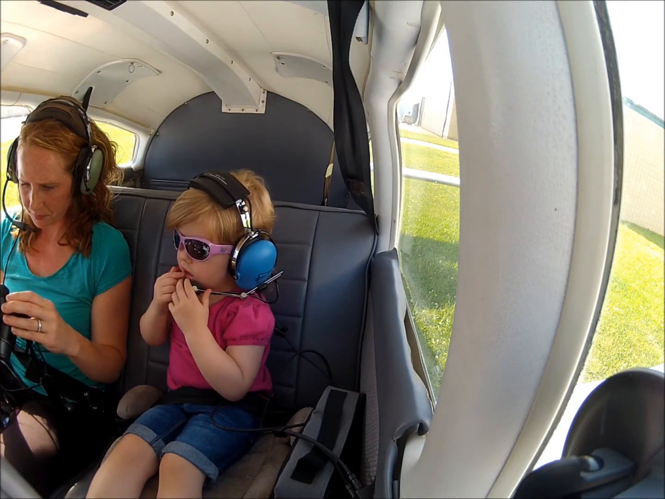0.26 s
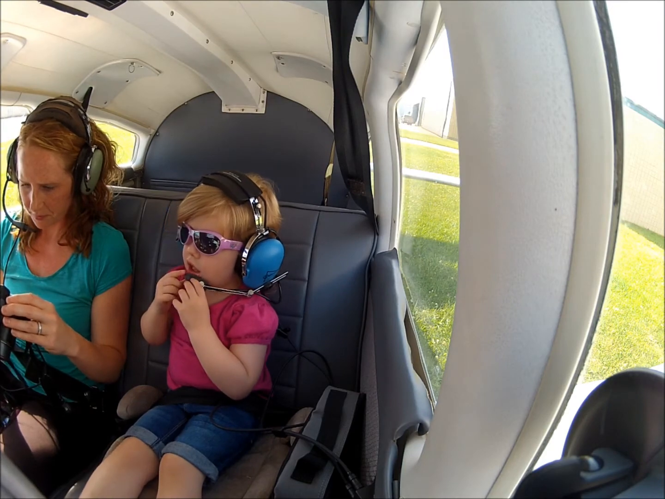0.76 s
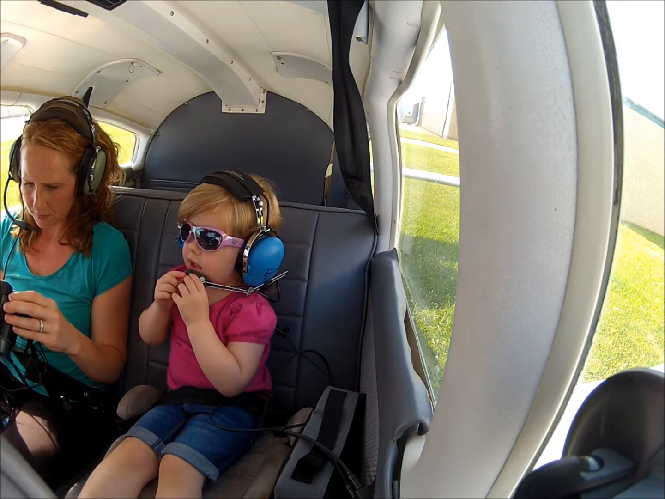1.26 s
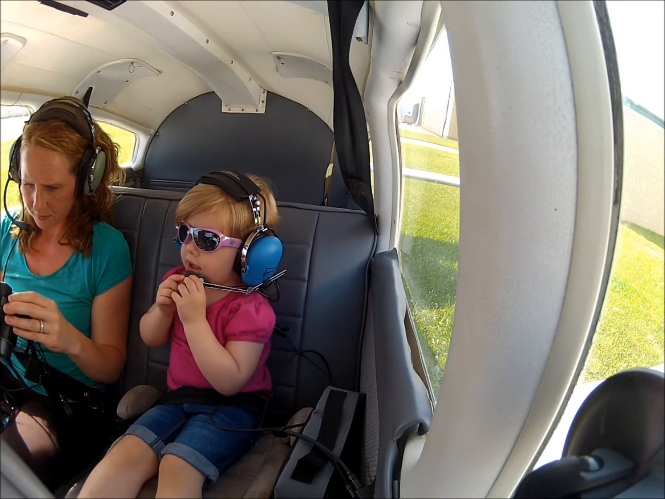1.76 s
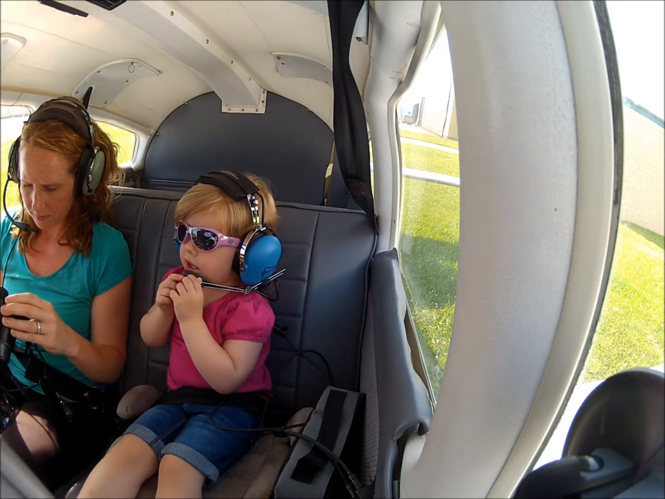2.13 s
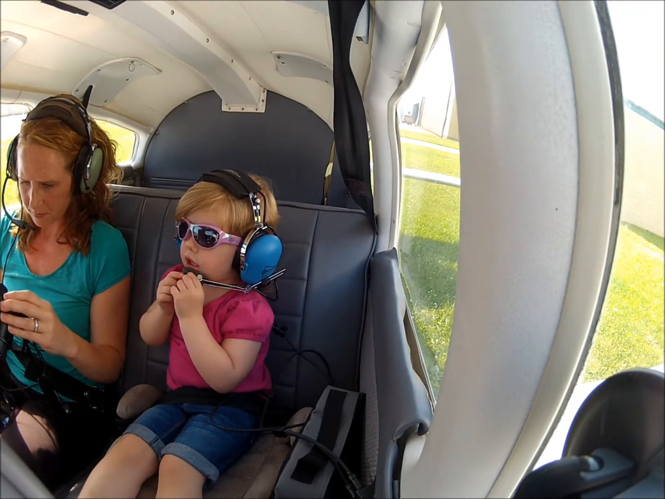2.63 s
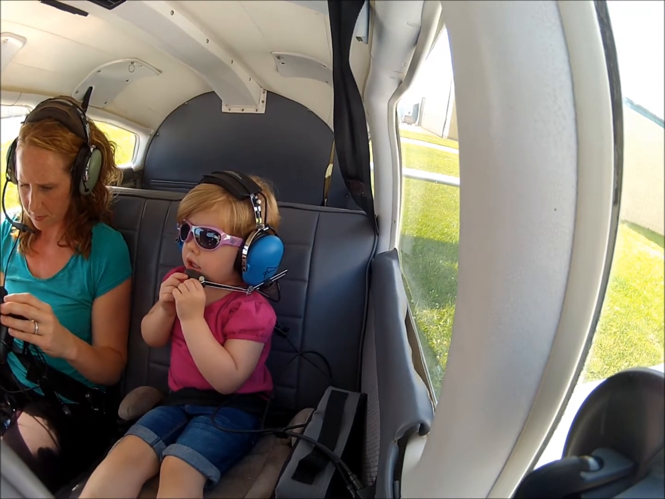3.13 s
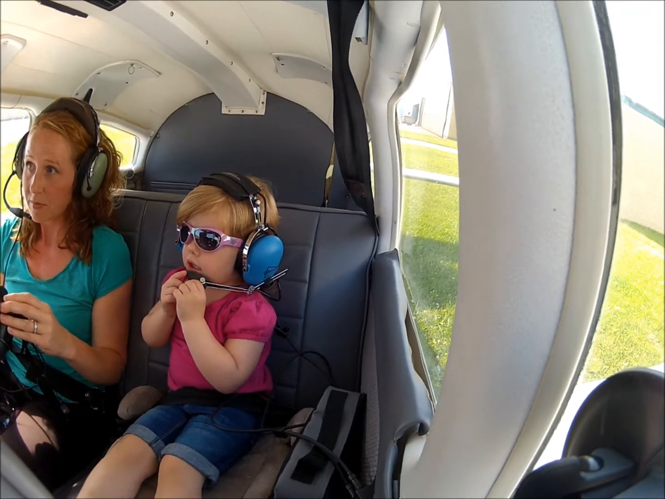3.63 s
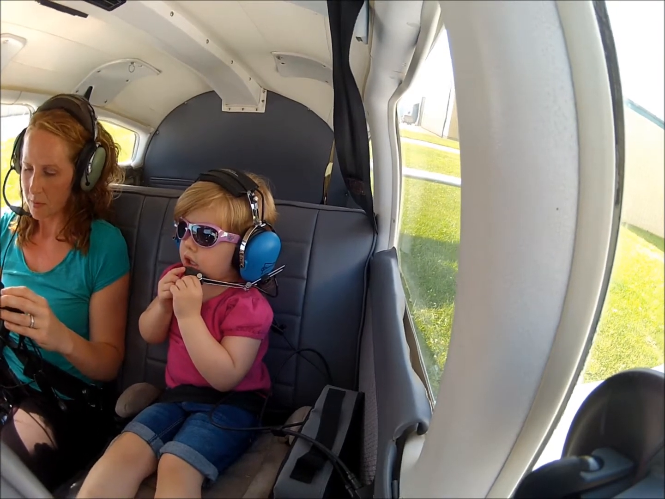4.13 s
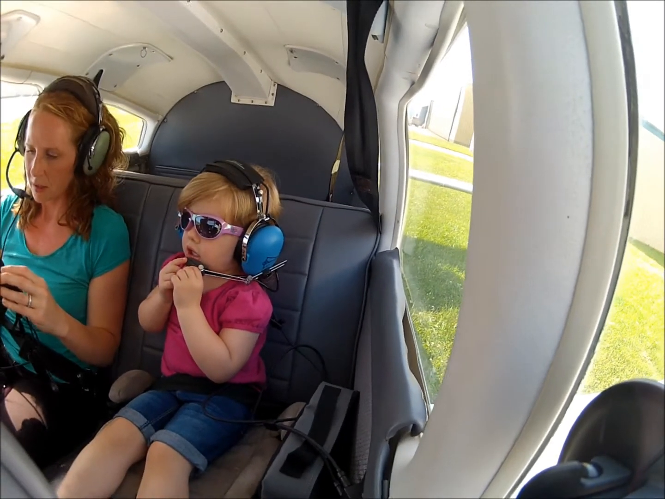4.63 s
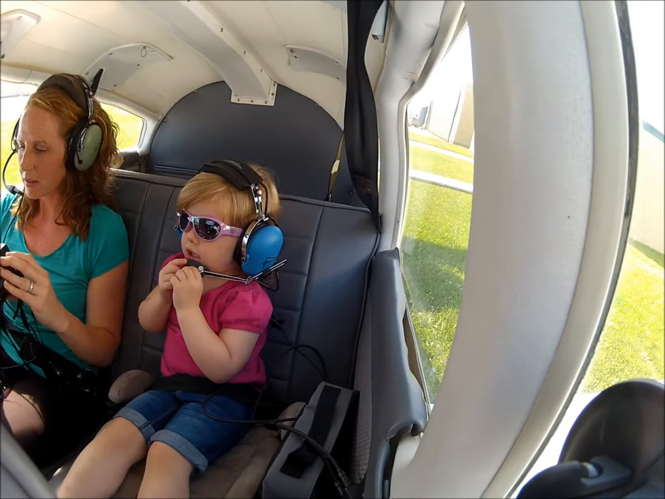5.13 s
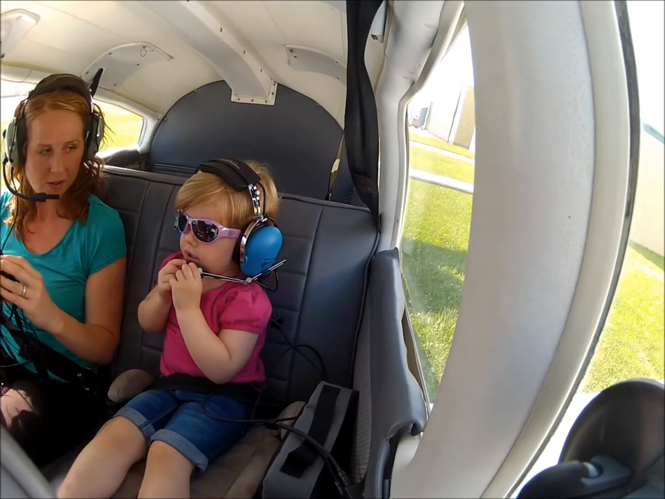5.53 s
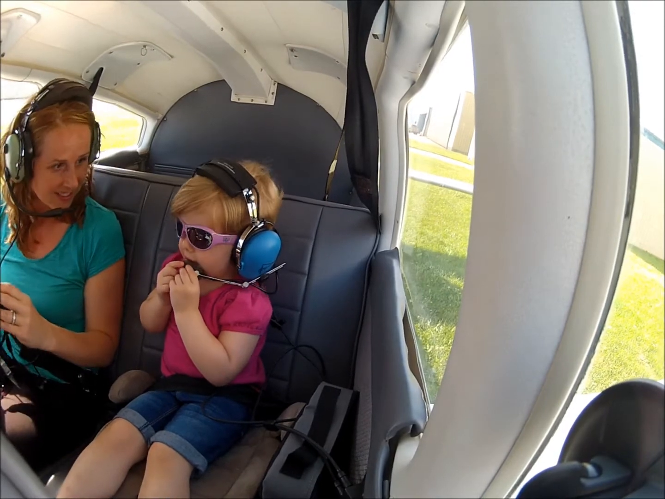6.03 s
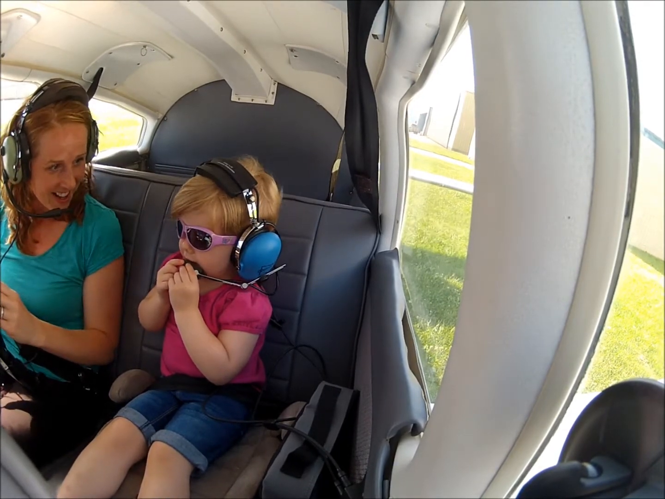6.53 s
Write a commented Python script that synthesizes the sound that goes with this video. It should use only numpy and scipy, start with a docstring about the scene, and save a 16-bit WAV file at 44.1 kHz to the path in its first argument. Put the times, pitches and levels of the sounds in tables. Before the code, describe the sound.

A quiet light-plane cabin ticks and hums with faint high whines and small clicks. Then a starter cranks unevenly, low shaking and loose knocks growing until several hard bangs land. The piston engine catches, its pulses quickly merging into a booming drone with panel clatter, hiss and propeller wash, settling fast and loud. Heard inside, through a coarse, grainy microphone.

```python
"""A four-cylinder aircraft engine starts, heard from the back seat of a small cabin.
Ringing strokes of a fuel pump and the sine whines of gyros open over quiet noise; switches click.
The starter's gear tones and tooth clatter come in, and filtered noise shakes the airframe as panels knock.
Heavy bangs mark the first charges; firing pulses then run up as boom, clatter and hiss to a fast idle,
with an exhaust note of sine lines in buffeting wash. A coarse sample-and-hold colours it all."""
import sys
import numpy as np
from scipy import signal
from scipy.fft import rfft, irfft
from scipy.io import wavfile
from scipy.ndimage import uniform_filter1d

SR = 44100
rng = np.random.default_rng(int(sys.argv[2]) if len(sys.argv) > 2 else 0)


def waveform_to_disk(signal):
    """Save audio, clipped to [-1, 1], as 16-bit WAV at the path in sys.argv[1]."""
    frames = np.transpose(np.atleast_2d(signal))
    scaled = np.clip(frames, -1, 1) * 32767
    samples = np.round(scaled).astype(np.int16)
    wavfile.write(sys.argv[1], SR, samples)


N = 298998
TIME = np.arange(N) / SR
FREQ = np.fft.rfftfreq(N, 1 / SR)


def amp(db):
    """Decibels to gain."""
    return 10 ** (np.asarray(db) / 20)


def sine(phase_turns):
    """Sine of a phase counted in turns."""
    return np.sin(2 * np.pi * phase_turns)


def evened(x):
    """Scales to rms 1."""
    return x / np.sqrt(np.mean(x ** 2) + 1e-20)


def level(rows, column=1):
    """Gain that follows a dB curve over time, at -120 dB before it begins."""
    rows = np.array(rows)
    return amp(np.interp(TIME, rows[:, 0], rows[:, column], left=-120))


def colour(x, spectrum):
    """Filters by a spectrum that falls a further 20 dB per octave past its ends; rms 1."""
    hz, db = np.transpose(spectrum)
    octaves_below = np.maximum(np.log2(hz[0] / (FREQ + 1)), 0)
    octaves_above = np.maximum(np.log2((FREQ + 1) / hz[-1]), 0)
    curve_db = np.interp(np.log(FREQ + 1), np.log(hz), db)
    gain = amp(curve_db - 20 * (octaves_below + octaves_above))
    return evened(irfft(rfft(x) * gain, N))


def noise(spectrum):
    """Coloured noise of rms 1."""
    return colour(rng.standard_normal(N), spectrum)


def drift(rate):
    """Random wander of rms 1: noise under a Gaussian low-pass of the given width in Hz."""
    return evened(irfft(rfft(rng.standard_normal(N)) * np.exp(-(FREQ / rate) ** 2), N))


def steadied(x, seconds):
    """Evens out swells longer than the given time."""
    size = max(int(seconds * SR), 2)
    power = uniform_filter1d(uniform_filter1d(x ** 2, size), size)
    return x / np.sqrt(abs(power) + 1e-6)


def dying(t, t60):
    """Exponential decay from t = 0 that falls 60 dB in t60 seconds."""
    return (t >= 0) * np.exp(-np.log(1000) * np.maximum(t, 0) / max(t60, .002))


def crossings(turns):
    """Samples at which a phase completes a turn."""
    return np.flatnonzero(np.diff(np.floor(turns)) > 0)


# Engine speed. Columns: t/s, f/Hz (firings a second)
ENGINE_SPEED = [(2.5, 5.36), (2.8, 9.5), (4.1, 10.5), (4.35, 16.5), (4.6, 22.2), (4.8, 38.8), (5.0, 44.7),
                (5.1, 47.4), (5.25, 51), (5.41, 56.8), (5.6, 61.7), (6.0, 59.3), (6.78, 59)]


def engine_speed():
    """Firing rate of the engine, from cranking to fast idle."""
    return np.interp(TIME, *np.transpose(ENGINE_SPEED))


def crankshaft():
    """Phase of the crank counted in firings; its speed wanders slightly."""
    return np.cumsum(engine_speed() * (1 + .007 * drift(15))) / SR


LABOUR_AT = .35  # place of the heaviest labour, in firings


def labour(turns):
    """1 as the crank climbs a compression, -1 as it swings free; one cycle every two firings."""
    return np.cos(np.pi * (turns - LABOUR_AT))


IDLE_HZ = 60  # firings a second


def by_speed(idle_db, db_per_octave):
    """Gain that grows with engine speed, fading in as the engine runs up."""
    run_up = np.interp(TIME, [4.6, 5.0], [0, 1])
    return amp(idle_db + db_per_octave * np.log2(engine_speed() / IDLE_HZ)) * run_up


# Crank, catch and run-up. Columns: t/s, boom level/dB, panel clatter level/dB, hiss level/dB (before trims)
ENGINE_EFFORT = [(2.45, -61, -62, -77), (2.55, -38, -54.5, -60), (2.8, -50.5, -55, -65),
                 (3.85, -48, -55.5, -63), (4.25, -39, -50, -58.5), (4.42, -26, -45.5, -48.5),
                 (4.75, -36, -38, -46), (5.05, -35, -35.5, -41.5), (5.3, -28.5, -33.5, -37),
                 (5.8, -19.5, -33, -36), (6.78, -20, -34, -36.5)]
# Strength of each cylinder's firing in turn. Column: relative level/dB
CYLINDER_LEVELS = [-8, -5, -5.5, -2.5]
# Cabin boom, loose panels and cowling hiss: spectra of the three layers. Columns: f/Hz, relative level/dB
BOOM_SPECTRUM = [(70, -46), (105, -3), (125, 6), (155, -2.5), (185, -17), (205, -19.5), (228, -6),
                 (265, -7), (300, -20.5), (400, -25), (600, -53)]
PANEL_SPECTRUM = [(250, -6), (350, -7), (450, -5.5), (520, -0.5), (570, 5), (650, -9.5), (760, 1), (840, 3),
                  (910, -6), (980, -32.5), (1100, -10), (1300, -23)]
COWLING_SPECTRUM = [(900, -7), (1080, 1.5), (1300, -4.5), (1500, 2), (1900, -1), (2250, 0.5), (2550, 7.5),
                    (2800, 1), (3100, -4), (3500, -10.5), (3900, 1.5)]
# the boom's throb: rate, rise and fall in dB either way once running, and the time of one crest
THROB_HZ, THROB_DB, THROB_AT_S = 8.8, 2.5, 5.96


def engine(turns):
    """Uneven firings boom in the cabin, rattle its panels and chop the hiss from the cowling."""
    at = crossings(turns)
    firings = np.zeros(N)
    firings[at] = amp(np.resize(CYLINDER_LEVELS, len(at)) + 2.2 * rng.standard_normal(len(at)))
    # compression alone puffs less than combustion
    burning = np.interp(TIME, [4.2, 4.8], [.35, 1])
    smeared = signal.lfilter([1], [1, -np.exp(-1 / (0.005 * SR))], firings)
    puffs = steadied(evened(smeared), 0.03) * burning

    pulsed_boom = steadied(colour(firings, BOOM_SPECTRUM), .15) * burning
    boom = .9 * pulsed_boom + .45 * noise(BOOM_SPECTRUM)
    rattling = rng.standard_normal(N) * (1.5 + 0.29 * puffs) * amp(1.55 * drift(19))
    clatter = colour(rattling, PANEL_SPECTRUM)
    chopped = rng.standard_normal(N) * (1.4 + 0.29 * puffs) * amp(0.5 * drift(40))
    hiss = colour(chopped, COWLING_SPECTRUM)

    throb = amp(THROB_DB * burning * np.cos(2 * np.pi * THROB_HZ * (TIME - THROB_AT_S)))
    return (amp(-0.5) * steadied(boom, 0.084) * throb * level(ENGINE_EFFORT, column=1)
            + amp(1.5) * steadied(clatter, 0.72) * level(ENGINE_EFFORT, column=2)
            + amp(3.0) * steadied(hiss, 0.84) * level(ENGINE_EFFORT, column=3))


# Exhaust lines. Columns: multiple of the firing rate, relative level/dB
EXHAUST_ORDERS = [(0.748, -7.5), (1, 9.5), (1.498, -32), (2.001, -10), (2.248, -9), (3, -35),
                  (3.751, -20.5), (4, -32.5), (5.002, -37)]
# Surges and stumbles of the combustion. Columns: t/s, level change/dB, half length/s
COMBUSTION_SURGES = [(5.38, 4.5, 0.09), (5.619, 5, 0.019), (5.726, -24, 0.03), (6.15, 6, .03)]
NOTE_DB, NOTE_DB_PER_OCTAVE = -12, 5.5  # level at idle, growth per doubling of speed
NOTE_FULL_S = 5.19  # the note is held 9 dB down until here


def exhaust(turns):
    """The deep note of exhaust and propeller; unequal cylinders add lines between its harmonics."""
    lines = sum(amp(db + 1.5 * drift(8)) * sine(k * turns + rng.random()) for k, db in EXHAUST_ORDERS)
    surge_db = sum(db * np.exp(-((TIME - s) / length) ** 2) for s, db, length in COMBUSTION_SURGES)
    held_db = np.where(TIME > NOTE_FULL_S, 0, -9)
    return evened(lines) * by_speed(NOTE_DB, NOTE_DB_PER_OCTAVE) * amp(surge_db + held_db)


# Rocking airframe and wash-buffeted fuselage: spectra. Columns: f/Hz, relative level/dB
ROCKING_SPECTRUM = [(8, -15), (16, -4), (22, -0.5), (30, -2), (42, -1.5), (55, 3.5), (65, -11.5),
                    (100, -26.5), (150, -44)]
BUFFETING_SPECTRUM = [(10, -40), (24, -50), (36, 4), (48, 1), (68, 3), (82, 3), (96, -2.5), (130, -11.5),
                      (200, -15.5)]
# Shaking of the airframe, before labour and jolts. Columns: t/s, level/dB
AIRFRAME_SHAKE = [(2.45, -57), (2.55, -30.5), (3.0, -32.5), (3.3, -27.5), (4.05, -27.5), (4.27, -23.5),
                  (4.35, -13), (4.77, -14), (4.92, -26.5), (5.2, -24)]
# Jolts as the starter takes up the load. Columns: onset t/s, peak level/dB added to the shaking
STARTER_JOLTS = [(2.52, -18.5), (3.13, -30)]
JOLT_RISE_S = 0.054
LABOUR_DB = 2.5  # the shaking dips and rises by this with each labour
WASH_DB, WASH_DB_PER_OCTAVE = -15.5, 13  # level at idle, growth per doubling of speed


def airframe(turns):
    """The engine rocks the airframe on its wheels, then the propeller wash buffets it."""
    rocking = steadied(noise(ROCKING_SPECTRUM), .035)
    buffeting = steadied(noise(BUFFETING_SPECTRUM), .06)
    shaking = level(AIRFRAME_SHAKE) * amp(-LABOUR_DB * labour(turns))
    for s, db in STARTER_JOLTS:
        age = np.maximum(TIME - s, 0) / JOLT_RISE_S
        shaking = shaking + amp(db) * (age * np.exp(1 - age)) ** 2
    # the mounts absorb the shaking once the engine is fast
    slow_running = np.interp(TIME, [4.85, 5.2], [1, 0])
    return rocking * shaking * slow_running + buffeting * by_speed(WASH_DB, WASH_DB_PER_OCTAVE)


# Starter motor, before the mix of its layers. Columns: t/s, level/dB
STARTER_LEVEL = [(2.5, -76), (2.8, -58.5), (3.5, -58.5), (4.15, -59), (4.45, -45.5), (4.7, -99)]
# Gear whine at unsagged speed. Columns: f/Hz, relative level/dB
GEAR_WHINE = [(1130, -2), (1560, -15), (2280, -12.5), (2560, 6.5)]
# Body and crack of struck parts: spectra, for gear teeth and knocks. Columns: f/Hz, relative level/dB
BODY_SPECTRUM = [(90, -25), (220, 6.5), (400, -7.5), (600, -5), (790, 1.5), (960, -8.5), (1130, -8.5),
                 (1500, -7)]
CRACK_SPECTRUM = [(900, -19), (1250, -21), (1700, 4.5), (2200, 1), (2700, 7.5), (3050, -6), (3400, -0.5),
                  (3900, -8.5)]
LABOUR_SAG = 0.0261  # fraction of starter speed
TEETH_PER_S = 320


def starter(turns):
    """The starter's gears whine and chatter, sagging at each labour, and fade as the engine runs up."""
    wobble = .009 * drift(14) + .022 * drift(220)
    seconds = np.cumsum(1 - LABOUR_SAG * labour(turns) + wobble) / SR
    whine = sum(amp(db + 2.7 * drift(28)) * sine(hz * seconds) for hz, db in GEAR_WHINE)
    teeth = (rng.random(N) < TEETH_PER_S / SR) * rng.standard_normal(N)
    ring = dying(TIME[:SR // 20], 0.019) * rng.standard_normal(SR // 20)
    chatter = signal.oaconvolve(teeth, ring)[:N]
    return level(STARTER_LEVEL) * (amp(-5.5) * whine
                                   + amp(-3.5) * colour(chatter, CRACK_SPECTRUM)
                                   + amp(-5) * colour(chatter, BODY_SPECTRUM))


# Heavy bangs, as the starter engages and the first charges fire; levels before the blow's mix.
# Columns: t/s, body level/dB, body f/Hz, crack level/dB, ring time/s
HEAVY_BANGS = [(2.537, -19.5, 610, -28, 0.052), (4.165, -9, 598, -33, 0.044), (4.353, 0.5, 586, -16, 0.03),
               (4.501, 0, 723, -13, 0.03)]
BANG_CRACK_HZ, BANG_EDGE_DB = 1497, -31
# Knocks of the drive and loose panels; levels before the blow's mix.
# Columns: t/s, body level/dB, body f/Hz, crack level/dB
DRIVE_KNOCKS = [(2.469, -42, 616, -38), (2.48, -36, 1180, -41), (2.51, -27, 563, -47),
                (2.617, -38, 580, -47), (2.642, -43, 616, -39), (2.682, -38, 720, -43),
                (2.757, -28, 570, -42.5), (3.005, -35, 607, -48), (3.102, -30, 585, -59),
                (3.211, -24.5, 470, -41), (3.223, -22.5, 734, -37), (3.326, -34, 604, -39.5),
                (3.402, -31.5, 560, -38.5), (3.442, -40, 555, -41.5), (3.576, -26, 780, -36.5),
                (3.618, -42, 770, -39), (3.683, -27, 781, -38), (3.896, -32.5, 780, -37.5),
                (4.009, -25.5, 764, -35), (4.048, -25, 590, -34), (4.105, -23, 610, -37.5),
                (4.191, -32, 755, -37), (4.307, -30, 532, -32.5), (4.378, -24, 566, -35),
                (4.43, -15.5, 547, -33), (5.106, -20, 751.3, -32), (5.912, -14, 762.6, -27)]
KNOCK_CRACK_HZ, KNOCK_SPREAD = 1640, 0.095  # central pitch, largest fraction off it
KNOCK_RING_S, KNOCK_EDGE_DB = 0.042, -5.5
REBOUND_S, REBOUND_DB = .016, -10.5  # a knocked part rebounds once: mean delay, loss
# a few more rattles at chance times while the engine is cranked and runs up
RATTLE_FROM_S, RATTLE_TO_S, RATTLE_COUNT = 2.55, 5.2, 5
RATTLE_HZ, RATTLE_BODY_DB, RATTLE_CRACK_DB = 584, -33, -44
# Switches in the cockpit; level before the blow's mix. Columns: t/s, crack level/dB, crack f/Hz
COCKPIT_SWITCHES = [(.263, -38, 2485), (1.894, -52, 2360), (2.107, -47.5, 2765)]
SWITCH_BODY_DB, SWITCH_BODY_HZ = 1.5, 590  # body level relative to the crack
SWITCH_RING_S, SWITCH_EDGE_DB = 0.073, -15


def blows():
    """Every blow as (t/s, body level/dB, body f/Hz, crack level/dB, crack f/Hz, ring time/s, edge/dB)."""
    rows = [(s, body_db, hz, crack_db, BANG_CRACK_HZ, t60, BANG_EDGE_DB)
            for s, body_db, hz, crack_db, t60 in HEAVY_BANGS]
    rows += [(s, db + SWITCH_BODY_DB, SWITCH_BODY_HZ, db, hz, SWITCH_RING_S, SWITCH_EDGE_DB)
             for s, db, hz in COCKPIT_SWITCHES]

    chance = rng.uniform(-1, 1, (RATTLE_COUNT, 3))
    slots, gap = np.linspace(RATTLE_FROM_S, RATTLE_TO_S, RATTLE_COUNT, endpoint=False, retstep=True)
    rattles = [(s + gap * abs(a), RATTLE_BODY_DB + 3 * b, RATTLE_HZ, RATTLE_CRACK_DB + 3 * c)
               for s, (a, b, c) in zip(slots, chance)]

    for s, body_db, hz, crack_db in DRIVE_KNOCKS + rattles:
        spot, lag = rng.uniform(-0.992, 1, 2)
        crack_hz = KNOCK_CRACK_HZ * (1 + KNOCK_SPREAD * spot)
        for delay, loss_db in (0, 0), (REBOUND_S * (1 + .5 * lag), REBOUND_DB):
            rows.append((s + delay, body_db + loss_db, hz, crack_db + loss_db, crack_hz,
                         KNOCK_RING_S, KNOCK_EDGE_DB))
    return rows


# Soft bumps of the cabin. Columns: t/s, level/dB, f/Hz, ring time/s
CABIN_BUMPS = [(0.267, -43.5, 147, .2), (0.841, -47, 148, 0.14), (4.165, -23, 75, 0.068),
               (4.354, -9.5, 108.6, 0.055), (4.46, -11, 81, 0.055), (4.501, -6, 87.5, 0.1)]
METAL_HZ = 3414  # thin metallic edge of a blow
SWELL_S = 0.015  # time a blow takes to build


def knocks():
    """Each blow rings a panel at its own pitch under a coloured crack; bumps ring low."""
    body = steadied(noise(BODY_SPECTRUM), 0.014)
    crack = steadied(noise(CRACK_SPECTRUM), 0.0023)
    fuzz = steadied(drift(170), 0.00044)
    out = np.zeros(N)
    for s, body_db, body_hz, crack_db, crack_hz, t60, edge_db in blows():
        span = slice(int(s * SR), int(s * SR) + SR // 4)
        t = TIME[span] - s
        thud = 0.44 * body[span] + 0.69 * sine(body_hz * t) + 0.19 * sine(1130 * t)
        tones = sine(crack_hz * t) + amp(edge_db) * sine(METAL_HZ * t)
        snap = 0.59 * crack[span] + 0.77 * fuzz[span] * tones
        swell = (1 - dying(t, SWELL_S)) ** 2
        out[span] += swell * (amp(body_db) * thud + amp(crack_db + 4.0) * snap) * dying(t, t60)
        # the padded cabin rings on briefly
        out[span] += swell * amp(crack_db - 34.0) * snap * dying(t, 0.24)
    for s, db, hz, t60 in CABIN_BUMPS:
        out += amp(db) * dying(TIME - s, t60) * sine(hz * (TIME - s))
    return out


BANG_BOOM_HZ, BANG_BOOM_DB, BANG_BOOM_S = 225.9, -20, 0.18  # level relative to the bang's body


def boom_after_bangs():
    """Each bang sets the air of the cabin booming for a moment."""
    swell = sum(amp(db) * (dying(TIME - s, BANG_BOOM_S) - dying(TIME - s, SWELL_S))
                for s, db, *_ in HEAVY_BANGS)
    return amp(BANG_BOOM_DB) * swell * np.sin(2 * np.pi * BANG_BOOM_HZ * TIME + 1.7 * drift(32))


# Ring of a pump stroke. Columns: delay t/s, f/Hz, relative level/dB, ring time/s
STROKE_RING = [(0, 1146, -52, 0.033), (.002, 776, -58, 0.045), (.003, 611.5, -58.5, 0.091),
               (.007, 557, -66, 0.038), (0.047, 620, -59, 0.026)]
# Fuel pump hum. Columns: multiple of the stroke rate, rms level/dB before its wander
HUM_ORDERS = [(2, -70), (3, -43.5), (4, -55.5), (5, -69.5), (8, -74.5)]
PUMP_HZ = 17.495  # strokes a second


def fuel_pump():
    """A plunger ticks out and back, no two strokes alike, and hums through the cabin floor."""
    turns = (TIME - .047) * PUMP_HZ
    at = crossings(turns)
    ticks = np.zeros(N)
    force_db = 3 * rng.uniform(-1, 1, len(at))
    for delay, hz, db, t60 in STROKE_RING:
        t = TIME[:SR // 5] - delay
        strokes = np.zeros(N)
        strokes[at] = amp(force_db + 3 * rng.uniform(-1, 1, len(at)))
        # subtracting a faster decay softens the onset
        ring = signal.oaconvolve(strokes, dying(t, t60) - dying(t, 0.0099))[:N]
        ticks += amp(db + 5.0) * ring * np.sin(2 * np.pi * hz * TIME + 0.27 * drift(45))
    hum = sum(amp(db) * np.sqrt(2) * sine(k * turns + rng.random()) for k, db in HUM_ORDERS)
    # the strokes soften once the line is full
    primed = np.interp(TIME, [2.35, 2.5], [1, .4])
    return ticks * primed + hum * amp(1.1 * drift(8))


# Gyro whine. Columns: f/Hz at the start, rise in Hz a second, level/dB at the start, level/dB from 2 s on
GYRO_WHINES = [(2080, 26, -69, -76.5), (2260, 22, -82, -88), (2550, 6.4, -79.5, -74), (2680, 28, -80, -80),
               (1800, 18, -79, -79.5), (3520, 12, -76.5, -76.5)]


def gyros():
    """Instrument gyros slowly gather speed; each whine has its own start and later level."""
    out = np.zeros(N)
    for hz, rise, start_db, later_db in GYRO_WHINES:
        whine_db = np.interp(TIME, [0, 2], [start_db, later_db]) + 0.36 * drift(3.1)
        out += amp(whine_db) * sine(np.cumsum(hz + rise * TIME) / SR)
    return out


# Quiet cabin background: spectrum. Columns: f/Hz, relative level/dB
QUIET_SPECTRUM = [(20, 3), (60, -4), (140, -1.5), (280, -1.5), (400, -9.5), (700, -12), (1000, -13),
                  (1500, -17.5), (2400, -18), (3200, -22), (3900, -18)]


def quiet_cabin():
    """Steady coloured noise lies under everything."""
    return amp(-61.5) * noise(QUIET_SPECTRUM)


def scene():
    """Everything in the cabin; one crankshaft drives all the engine's sounds."""
    turns = crankshaft()
    running = engine(turns) + exhaust(turns) + airframe(turns) + starter(turns)
    struck = knocks() + boom_after_bangs()
    background = fuel_pump() + gyros() + quiet_cabin()
    return (running + struck + background)[None]


HOLD_HZ, EDGE_HZ = 8000, 15400  # coarse sample rate, upper edge of the mirrored sound


def record(dry):
    """A low sample rate with each sample held: the sound is mirrored around multiples of that rate."""
    low_pass = signal.firwin(301, 3780, fs=SR)[None]
    narrow = signal.oaconvolve(np.clip(dry, -.95, .95), low_pass, "same")
    carriers = np.cos(2 * np.pi * HOLD_HZ * TIME) + np.cos(2 * np.pi * 2 * HOLD_HZ * TIME)
    mirrored = narrow * (1 + 2 * carriers)
    hz = np.linspace(0, SR / 2, 1025)
    # holding a sample droops the treble as a sinc; a gentle tilt lifts it slightly
    hold_gain = np.sinc(hz / HOLD_HZ) * amp(1.8 * hz / EDGE_HZ) * (hz < EDGE_HZ)
    hold = signal.firwin2(1023, hz, hold_gain, fs=SR)
    return signal.oaconvolve(mirrored, hold[None], "same")


dry = scene()
out = record(dry)
waveform_to_disk(out)
```